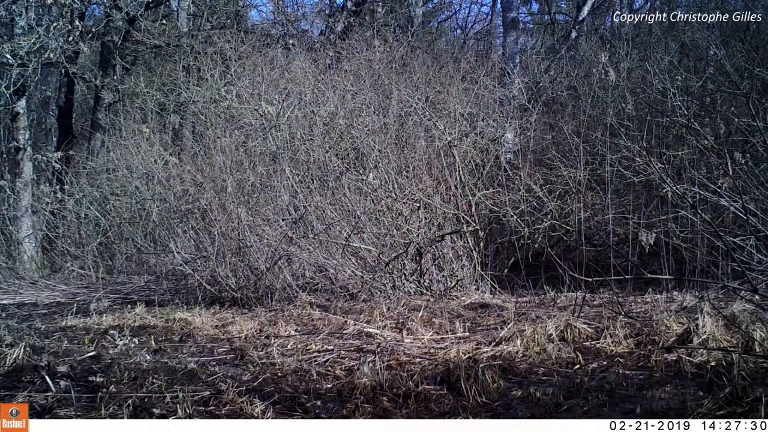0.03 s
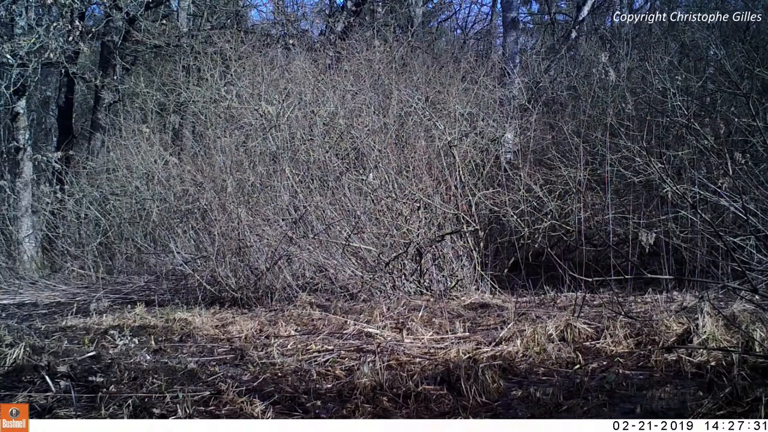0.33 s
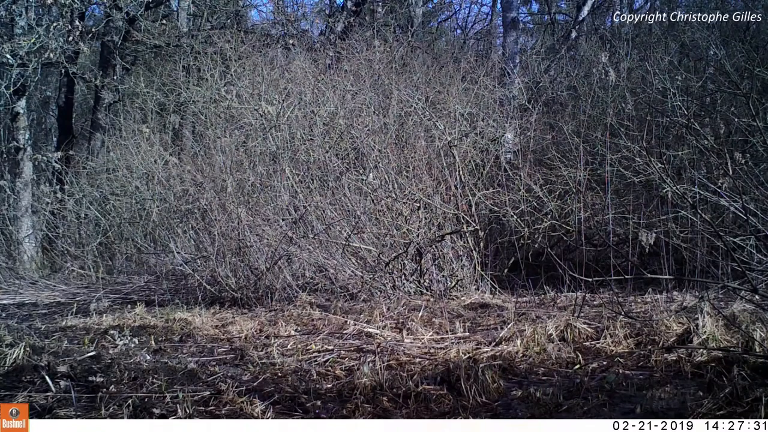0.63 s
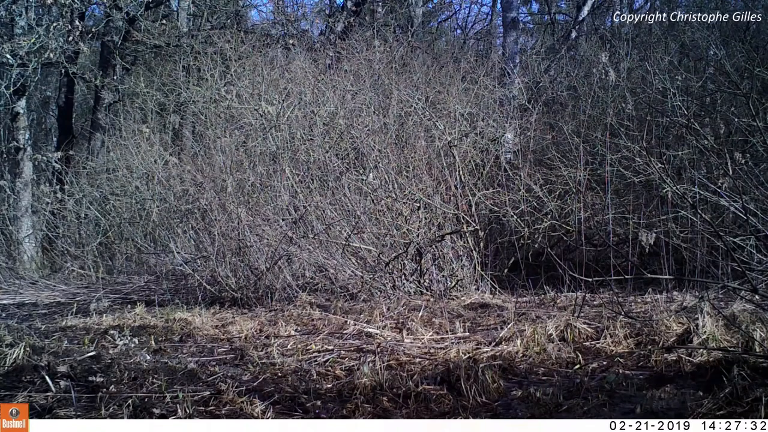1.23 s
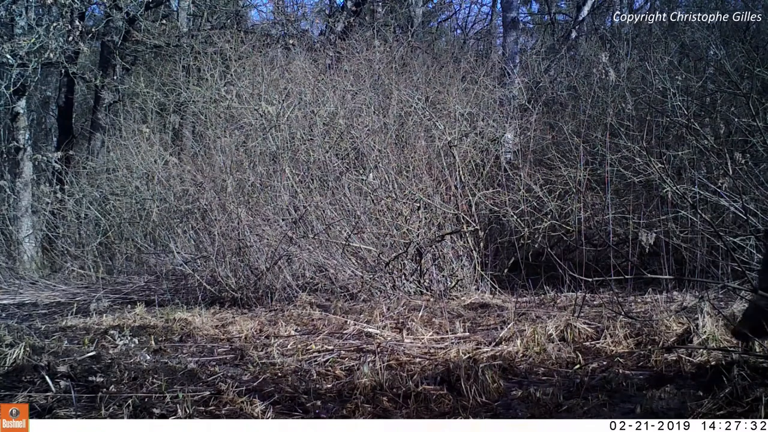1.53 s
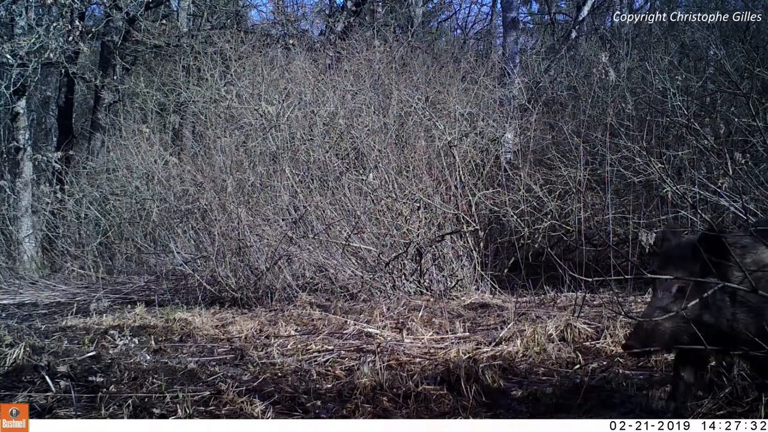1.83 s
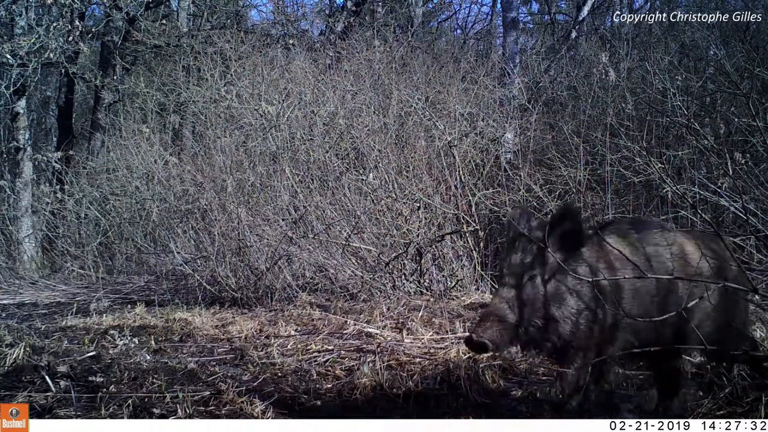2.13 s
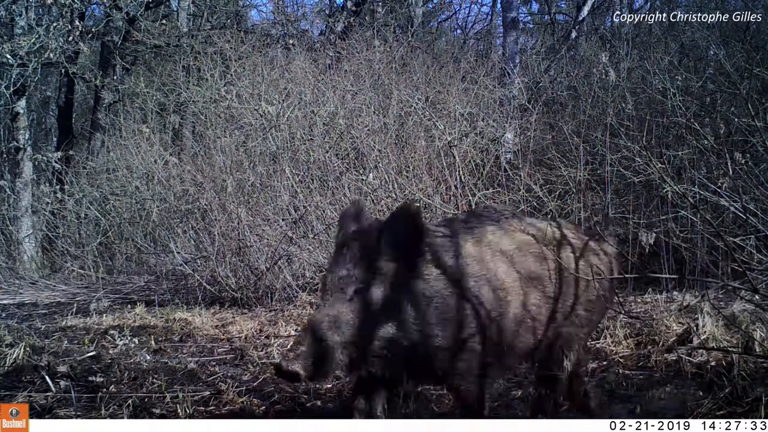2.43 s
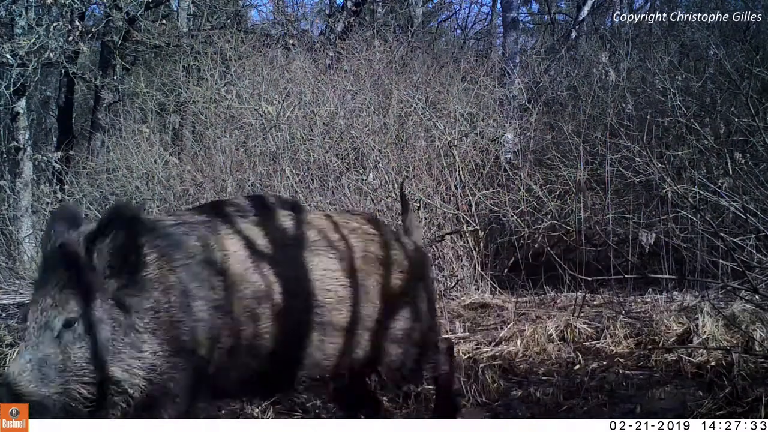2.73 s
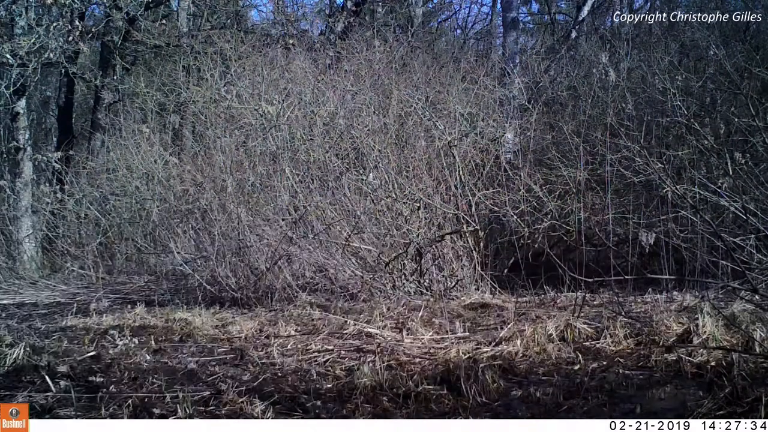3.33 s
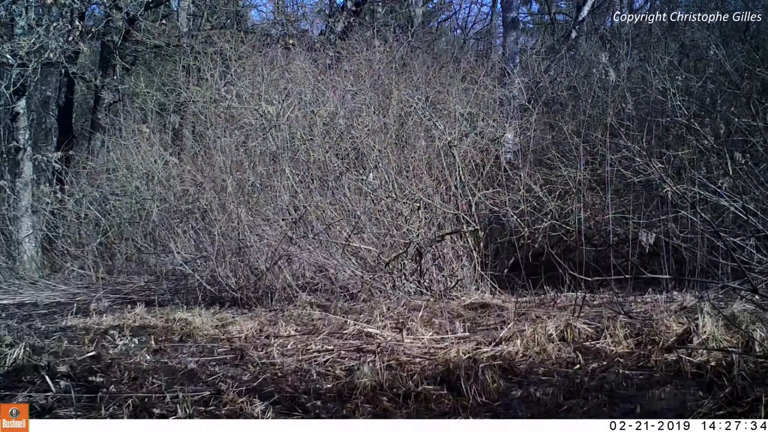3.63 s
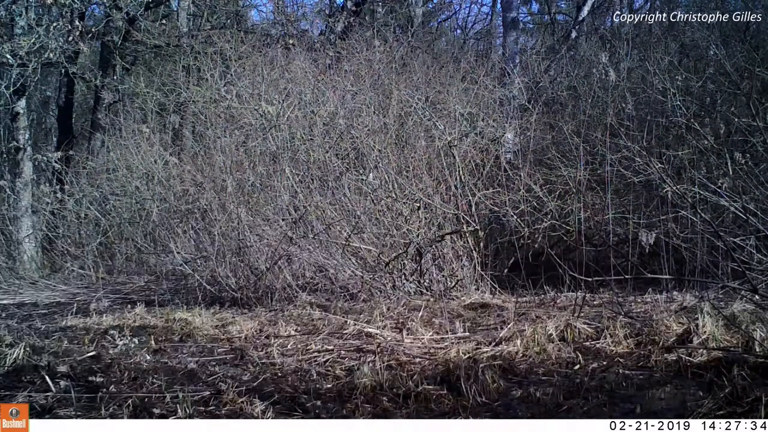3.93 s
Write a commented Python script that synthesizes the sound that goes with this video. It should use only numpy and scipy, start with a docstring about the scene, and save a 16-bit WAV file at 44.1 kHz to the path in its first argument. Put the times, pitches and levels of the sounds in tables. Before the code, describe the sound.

The crackling steps of a wild boar pass near the microphone through dry woodland grass and leaves, with sharp twig snaps and soft, dull hoof pops. Light wind rumbles throughout; two faint bird whistles come in the second half.

```python
"""Wild boar trotting past

A boar passes a small camera at a woodland edge. Dry grass swishes along its legs, dead leaves
crunch, twigs snap and its hooves press into soft ground. Faint wind rumbles under a thin hiss;
a far bird whistles twice."""
import sys
import numpy as np
from scipy import signal
from scipy.fft import rfft, irfft
from scipy.io import wavfile
from scipy.ndimage import uniform_filter1d

SR = 44100
rng = np.random.default_rng(int(sys.argv[2]) if len(sys.argv) > 2 else 0)


def to_wav(sig):
    """Store sig (one row per channel, or 1-D mono) as 16-bit WAV at the path in sys.argv[1].

    Samples outside -1..1 are clipped; the rate is SR.
    """
    pcm = np.clip(np.atleast_2d(sig), -1, 1) * 32767
    pcm = np.round(pcm).astype(np.int16)
    wavfile.write(sys.argv[1], SR, pcm.T)  # frames by channels


N = 176400
T = np.arange(N) / SR

# Dead-leaf spectrum. Each row: frequency in Hz, relative level in dB.
LEAF_SPECTRUM = [(400, -38.5), (1100, -4), (1600, -16), (2000, -2), (2300, -9), (2700, 2), (3100, 1),
                 (3500, -4.5), (4200, 4), (5200, 0), (7000, -7.5), (10000, -22), (14000, -89)]


def grass():
    """Stalks slide past the legs in a dense, bright crackle."""
    # Each row: peak time in seconds, rise in seconds, fall in seconds, level in dB.
    swishes = [(.03, 0.031, 0.086, -50), (.118, 0.0055, 0.027, -47.5), (.155, 0.033, 0.052, -47),
               (.245, 0.046, 0.098, -49.5), (.385, 0.046, 0.17, -53), (.555, 0.026, 0.02, -55),
               (.74, 0.048, 0.025, -55), (.805, 0.008, 0.016, -45.5), (1.037, 0.04, 0.078, -52),
               (1.20, 0.034, 0.056, -52), (1.275, 0.033, 0.1, -49), (1.47, 0.042, 0.076, -50.5),
               (1.54, 0.089, 0.15, -53), (1.71, 0.054, 0.044, -50.5), (1.905, 0.012, 0.088, -53),
               (2.165, 0.027, 0.06, -53.5), (2.47, 0.039, 0.043, -51.5), (2.545, 0.045, 0.071, -54),
               (2.72, 0.048, 0.065, -54), (3.06, 0.27, 0.081, -60.5), (3.255, 0.015, 0.027, -49),
               (3.355, 0.013, 0.012, -46.5), (3.604, 0.005, 0.016, -48), (3.645, 0.025, 0.33, -71)]
    # Each row: frequency in Hz, relative level in dB.
    stalk_spectrum = [(400, 10), (1500, -23), (2400, -17), (3500, -17.5), (4300, -3.5), (4900, -0.5),
                      (5700, -3), (6600, -5.5), (7600, -8.5), (8800, -8), (10000, -27), (11500, -18),
                      (14000, -26.5)]
    # Each row: time in seconds, treble gain in dB.
    treble_curve = [(0, 3), (.3, -2.5), (.8, -6.5), (1.7, -10), (1.95, -15), (3.0, -18), (4, -1)]
    treble_hz = 6500
    crackle = even(colour(ticks(per_s=5500, spread_db=3), stalk_spectrum))
    treble = signal.sosfiltfilt(signal.butter(3, treble_hz, "high", fs=SR, output="sos"), crackle)
    treble_gain = from_db(np.interp(T, *np.transpose(treble_curve)))
    return pressure(swishes) * (crackle + treble * (treble_gain - 1))


def leaves():
    """Dead leaves crushed underfoot give a coarser crackle."""
    # Each row: peak time in seconds, rise in seconds, fall in seconds, level in dB.
    crunches = [(.25, 0.0035, 0.028, -53), (.41, 0.019, 0.017, -53), (.62, 0.03, 0.012, -54),
                (.735, 0.01, 0.018, -54), (.805, 0.006, 0.046, -58), (1.036, 0.018, 0.025, -54.5),
                (1.225, 0.0078, 0.02, -50), (1.92, 0.022, 0.23, -60.5), (2.05, 0.013, 0.011, -55.5),
                (2.246, 0.012, 0.036, -50.5), (2.54, 0.029, 0.024, -51.5), (2.71, 0.028, 0.034, -56),
                (2.795, 0.012, .012, -48), (3.11, 0.017, 0.0086, -51.5), (3.345, 0.026, 0.15, -56),
                (3.637, 0.032, 0.02, -48), (3.652, .004, 0.006, -40.5), (3.67, 0.0036, 0.036, -50.5),
                (3.852, 0.02, 0.0052, -51.5), (3.9, 0.028, 0.037, -51.5)]
    return pressure(crunches) * even(colour(ticks(per_s=3500, spread_db=2.8), LEAF_SPECTRUM))


def twigs():
    """Fibres tear within milliseconds and ring the twig in three bands; splinters follow."""
    # Each row: peak time in seconds, tear time in seconds, base level in dB, woody trim in dB,
    # bright trim in dB, crack pitch in Hz.
    snaps = [(0.0194, .0012, -14, -21.5, -8, 5230), (0.031, 0.0026, -26, -32, -4, 4870),
             (0.0946, 0.00022, -23, -43, -12, 4900), (0.4435, 0.00038, -25.5, -19.5, -0.5, 7000),
             (0.496, 0.0011, -26.5, -7.5, -13, 4130), (.566, 0.00048, -38.5, -13, -2, 7050),
             (0.6286, 0.0013, -27, -9.5, -26, 4850), (0.64, 0.00066, -29, -11, -18, 3250),
             (0.895, 0.0011, -34.5, -14, -1.5, 4340), (1.036, .003, -28, -7, -10, 5170),
             (1.4394, 0.00053, -21.5, -30, -11.5, 4900), (1.4446, 0.0036, -25, -31, -11, 5600),
             (1.7201, .001, -38, -8, 8, 7000), (1.726, 0.0019, -39, -15, 7.5, 6500),
             (2.2448, 0.0027, -28, -11, -32, 4360), (2.3875, 0.00096, -30.5, -29, -11.5, 5460),
             (2.689, 0.0014, -24.5, -14, -5.5, 5270), (2.782, .001, -32.5, -9.5, -16, 4900),
             (2.7956, .0012, -26.5, -21, -20, 4650), (2.818, .003, -30, -21, -20, 4900),
             (2.8853, 0.0053, -20, -19, -40, 4590), (3.0288, 0.0012, -27, -17.5, -24, 4900),
             (3.0458, 0.00035, -20.5, -23, -24, 4800), (3.326, 0.0013, -17.5, -19.5, -16, 4230),
             (3.521, 0.0017, -33.5, -32, -21, 5030), (3.5393, 0.0022, -26.5, -8, -26, 3900),
             (3.648, 0.0014, -27, 0.5, -27, 4360), (3.657, .0035, -24.5, -3, -29, 3740),
             (3.7048, 0.0013, -31.5, -4.5, -30, 5160), (3.888, 0.0016, -32, -25, -9, 5800)]
    crack_ratio, woody_hz, bright_hz = 1.11, (2210, 3330), (6230, 8420)
    splinter_db, splinter_s = -11, 0.008
    out, t = np.zeros(N), np.arange(SR // 10) / SR
    for peak_s, tear_s, base_db, woody_db, bright_db, hz in snaps:
        lead_s = 2 * tear_s
        tear = np.exp(-np.minimum(((t - lead_s) / tear_s) ** 2, 20))
        splinters = from_db(splinter_db) * swell(t - lead_s, tear_s, splinter_s)
        fibres = (tear + splinters) * rng.standard_normal((3, len(t)))
        crack = band(fibres[0], hz / crack_ratio, hz * crack_ratio)
        woody = band(fibres[1], *woody_hz)
        bright = band(fibres[2], *bright_hz)
        for ring, offset_db in ((crack, 4.5), (woody, 9 + woody_db), (bright, 7.5 + bright_db)):
            unit_energy = ring / np.sqrt(np.sum(ring ** 2))
            add(out, peak_s - lead_s, from_db(base_db + offset_db) * unit_energy)
    return out


def hooves():
    """Each hoof squeezes a short run of dull pops out of the soil."""
    # Each row: peak time in seconds, fall in seconds, level in dB, pitch in Hz.
    steps = [(.252, 0.004, -46, 760), (.496, .004, -53, 1190), (.629, 0.012, -58, 1190),
             (1.04, 0.022, -61, 1230), (1.245, 0.055, -59, 1150), (1.345, 0.0062, -56.5, 1600),
             (1.75, 0.1, -61.5, 803), (1.897, 0.016, -56, 960), (1.919, .011, -49, 1050),
             (1.965, .035, -60.5, 1080), (2.07, 0.019, -55, 720), (2.232, 0.034, -55.5, 940),
             (2.535, .018, -51, 784), (2.688, .009, -54, 1170), (2.749, .008, -56, 900),
             (2.962, 0.014, -58, 1150), (3.225, 0.056, -61, 550), (3.653, .009, -51, 1100)]
    band_ratio = 1.41
    out, t = np.zeros(N), np.arange(SR // 2) / SR
    pops = ticks(per_s=1400, spread_db=4.5, range_hz=(382, 2450), ring_cycles=13)
    for peak_s, fall_s, db, hz in steps:
        rise_s = 0.35 * fall_s
        lead_s = min(2 * rise_s, peak_s)
        push = swell(t - lead_s, rise_s, fall_s)
        run = np.roll(pops, rng.integers(N))[:len(t)]
        squelch = push * even(band(run, hz / band_ratio, hz * band_ratio))
        push_rms = np.sqrt(np.mean(push ** 2))
        add(out, peak_s - lead_s, from_db(db) * push_rms * unit_rms(squelch))
    return out


def thud():
    """The ground thuds under a close step."""
    # Each row: peak time in seconds, rise in seconds, fall in seconds, level in dB.
    thuds = [(3.2, 0.0066, 0.057, -50)]
    return pressure(thuds) * even(band(rng.standard_normal(N), low_hz=122, high_hz=254))


def litter():
    """Trodden leaves keep ticking between steps; the soil beneath pops softly."""
    leaf_ticks = even(colour(ticks(per_s=460, spread_db=2.5), LEAF_SPECTRUM))
    soil_pops = even(band(grains(per_s=610, spread_db=4.5), low_hz=444, high_hz=2020))
    return from_db(-67.5) * leaf_ticks + from_db(-78) * soil_pops


def bird():
    """A far bird whistles gently falling pure tones."""
    # Each row: start in seconds, length in seconds, start pitch in Hz, end pitch in Hz, peak in dB.
    whistles = [(2.07, .09, 6650, 5950, -66), (3.45, .07, 4480, 4330, -63)]
    out = np.zeros(N)
    for start_s, length_s, start_hz, end_hz, db in whistles:
        hz = np.linspace(start_hz, end_hz, int(length_s * SR))
        arch = np.sin(np.linspace(0, np.pi, len(hz)))
        tone = np.sin(2 * np.pi * np.cumsum(hz) / SR)
        add(out, start_s, from_db(db) * arch * tone)
    return out


def air():
    """Low wind rumble and a steady thin hiss."""
    # Each row of both spectra: frequency in Hz, relative level in dB.
    wind_spectrum = [(15, -1.5), (28, 2.5), (60, -2.5), (100, -7), (200, -13.5), (320, -19.5), (500, -23.5),
                     (1600, -37), (4000, -80.5)]
    hiss_spectrum = [(500, -12.5), (1500, -22.5), (2300, -8), (3400, -6.5), (4300, -0.5), (4950, 2.5),
                     (5700, -1.5), (6800, -5.5), (8500, -12), (10000, -20), (11500, -16.5), (14000, -21)]
    wind = from_db(-53) * colour(rng.standard_normal(N), wind_spectrum)
    hiss = from_db(-65.5) * colour(rng.standard_normal(N), hiss_spectrum)
    return wind + hiss


def grains(per_s, spread_db):
    """Random tiny fractures, most small, a few large."""
    sizes = from_db(spread_db * np.minimum(rng.exponential(1, N), 5))
    signs = rng.choice([-1, 1], N)
    return unit_rms(sizes * signs * (rng.random(N) < per_s / SR))


def ticks(per_s, spread_db, range_hz=(900, 12990), ring_cycles=27.2):
    """Each fracture rings one of many short resonances, picked at random."""
    pitches_hz = np.geomspace(*range_hz, 28)
    clicks = grains(per_s, spread_db)
    picked = rng.integers(0, len(pitches_hz), N)
    out = np.zeros(N)
    for k, hz in enumerate(pitches_hz):
        angle = 2 * np.pi * hz / SR
        radius = from_db(-60 * hz / (ring_cycles * SR))  # 60 dB down after ring_cycles
        feedback = [1, -2 * radius * np.cos(angle), radius ** 2]
        out += signal.lfilter([1 - radius, 0, radius - 1], feedback, clicks * (picked == k) + 1e-18)
    return out


def even(x, window_s=0.044):
    """Hold short-term power at one; single ticks still stand out."""
    size = int(window_s * SR)
    power = uniform_filter1d(uniform_filter1d(x ** 2, size), size)
    return unit_rms(x / np.sqrt(np.abs(power) + 1e-9))


def swell(t, rise_s, fall_s):
    """Gaussian rise to t = 0, then exponential fall."""
    return np.exp(-np.minimum(np.where(t < 0, (t / rise_s) ** 2, t / fall_s), 20))


def pressure(strokes):
    """Envelope of overlapping strokes, summed in power."""
    return np.sqrt(sum((from_db(db) * swell(T - peak_s, rise_s, fall_s)) ** 2
                       for peak_s, rise_s, fall_s, db in strokes))


def colour(x, spectrum):
    """Minimum-phase filter with the given spectrum; unit power out."""
    hz, db = np.transpose(spectrum)
    bins_hz = np.arange(N // 2 + 1) * SR / N
    gain = from_db(np.interp(np.log(bins_hz + 1), np.log(hz), db))
    cepstrum = irfft(np.log(gain))
    cepstrum[1:N // 2] *= 2
    cepstrum[N // 2 + 1:] = 0
    return unit_rms(irfft(rfft(x) * np.exp(rfft(cepstrum))))


def band(x, low_hz, high_hz):
    """Causal band-pass."""
    return signal.sosfilt(signal.butter(2, [low_hz, high_hz], "band", fs=SR, output="sos"), x + 1e-18)


def from_db(db):
    """Decibels to gain."""
    return 10 ** (np.asarray(db) / 20)


def unit_rms(x):
    """Scale to unit power."""
    return x / np.sqrt(np.mean(x ** 2) + 1e-20)


def add(out, start_s, sound):
    """Mix a sound in at start_s."""
    start = max(int(start_s * SR), 0)
    out[start:start + len(sound)] += sound[:N - start]


def scene():
    """The boar's steps over bird and air, in mono."""
    return (grass() + leaves() + litter() + twigs() + hooves() + thud() + bird() + air())[None]


def record(dry):
    """The camera's case rings faintly; the top is cut steeply."""
    # Each row: resonance in Hz, boost in dB.
    case_modes = [(2225, 6), (2369, 6.5), (4959, 4.5), (6514, 6)]
    width_hz, cutoff_hz = 50, 14100
    ring = sum((from_db(db) - 1) * signal.lfilter(*signal.iirpeak(hz, hz / width_hz, fs=SR), dry)
               for hz, db in case_modes)
    return signal.sosfilt(signal.ellip(10, 0.2, 70, cutoff_hz, fs=SR, output="sos"), dry + ring)


dry = scene()
out = record(dry)
to_wav(out)
```